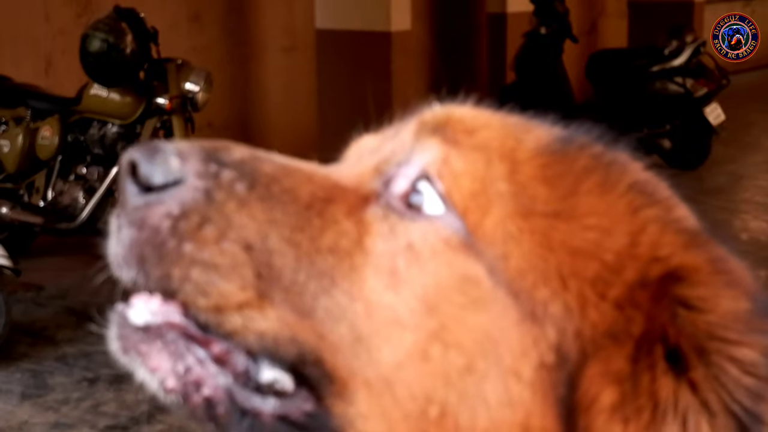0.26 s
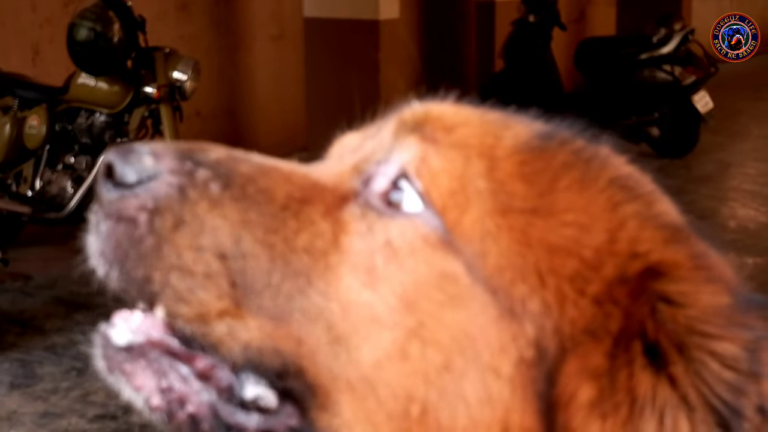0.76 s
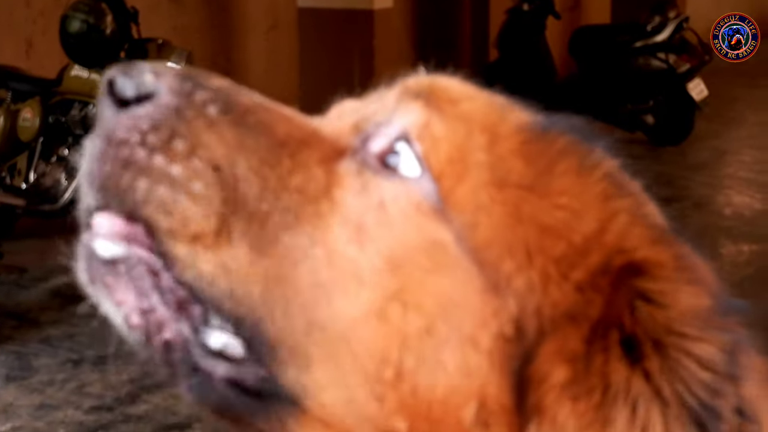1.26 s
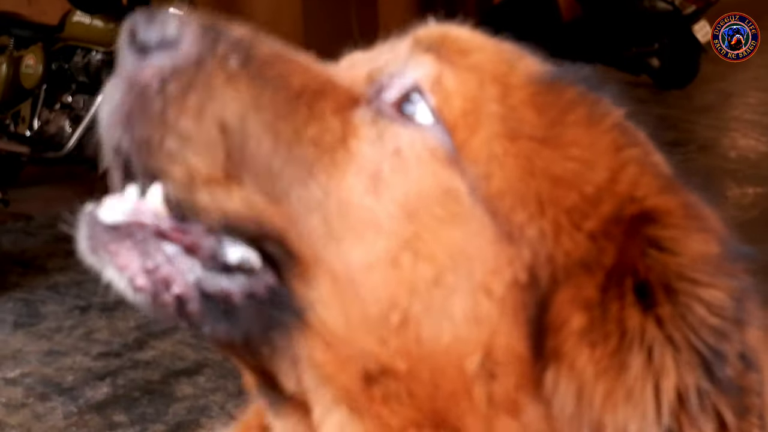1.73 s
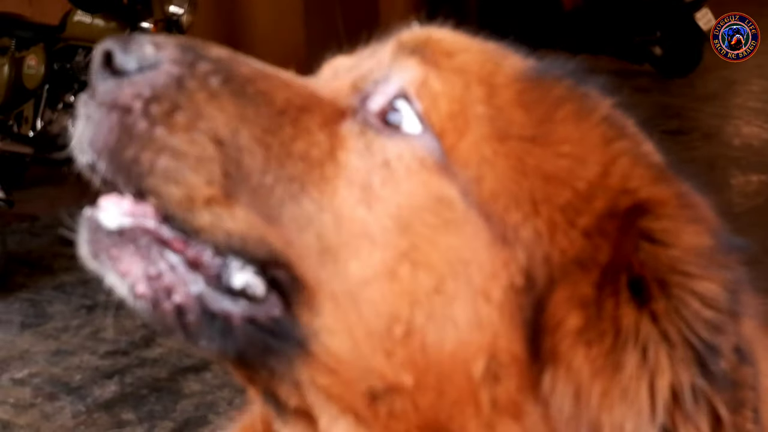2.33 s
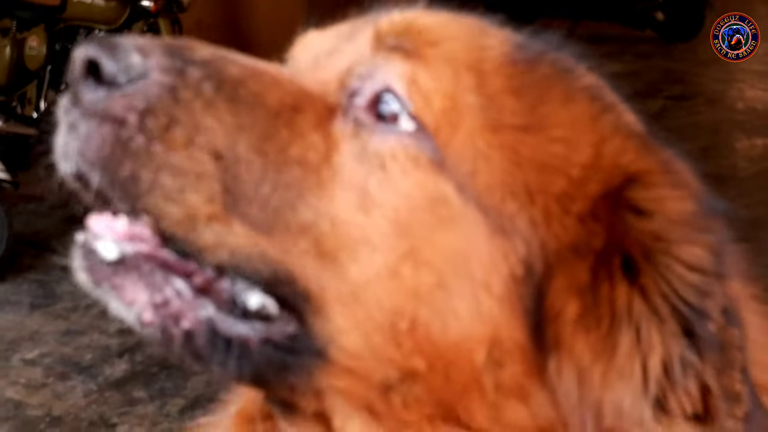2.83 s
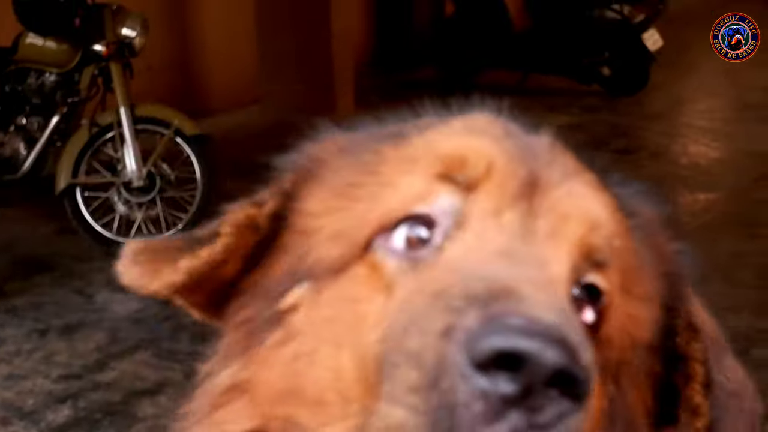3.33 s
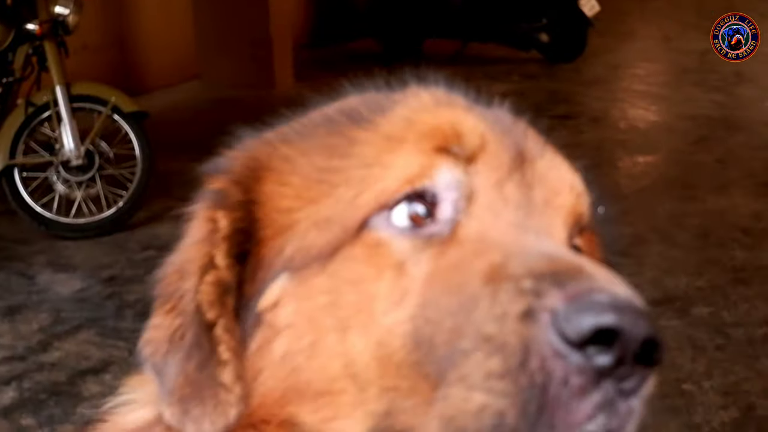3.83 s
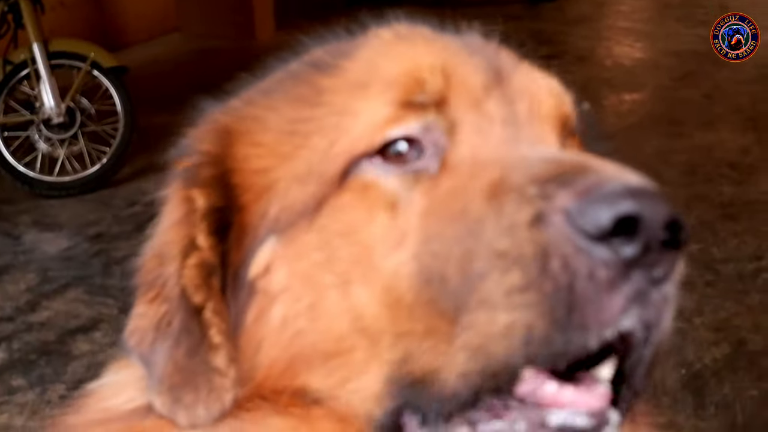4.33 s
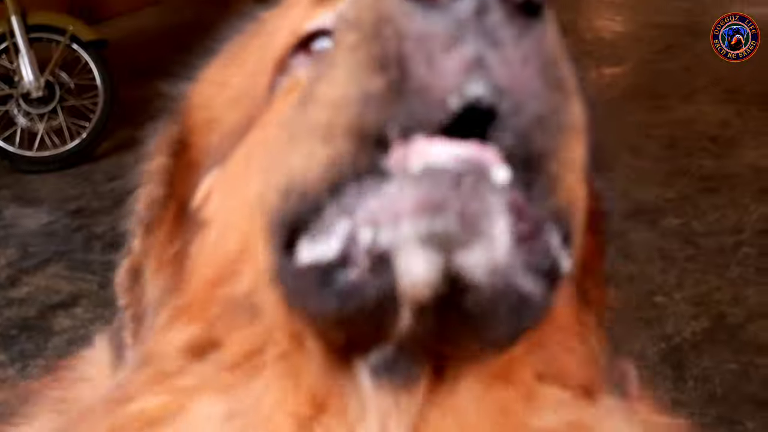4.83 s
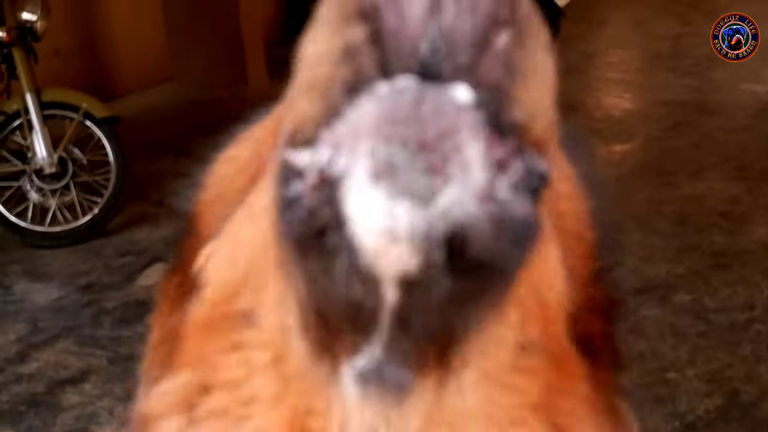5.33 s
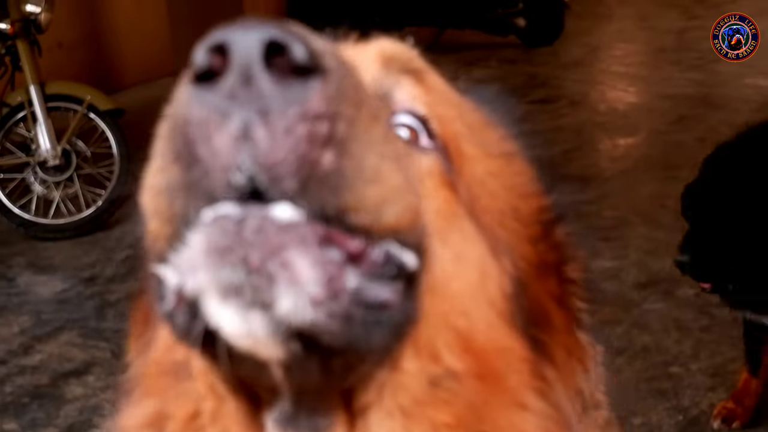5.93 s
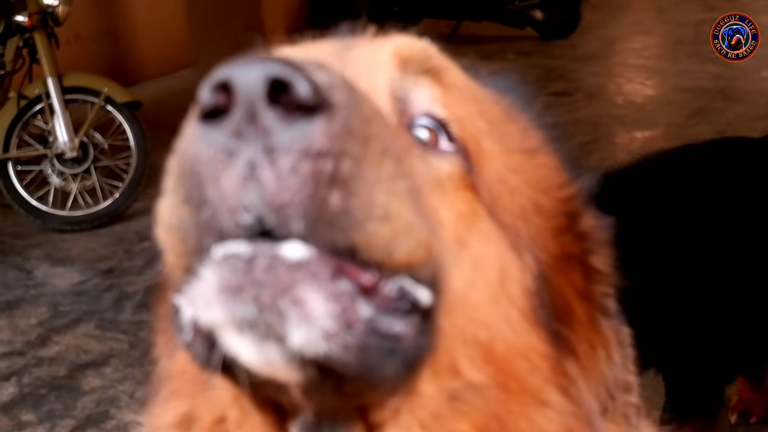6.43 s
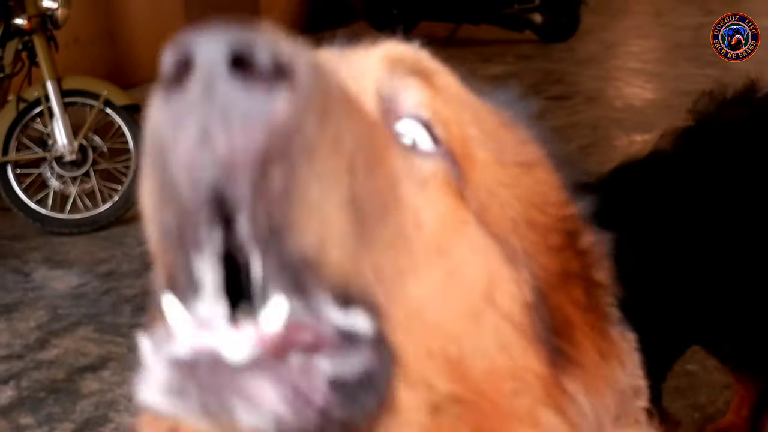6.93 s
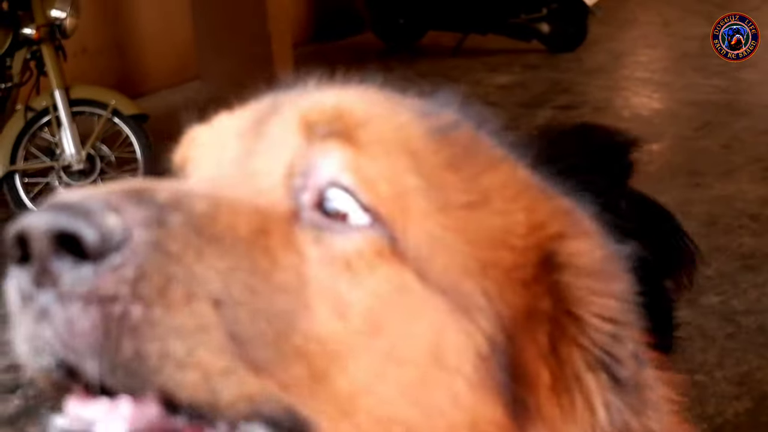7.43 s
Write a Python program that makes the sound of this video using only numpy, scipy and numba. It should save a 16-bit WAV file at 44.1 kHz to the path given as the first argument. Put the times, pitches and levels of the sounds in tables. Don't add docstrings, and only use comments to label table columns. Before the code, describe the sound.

A large dog barks loudly and hoarsely up close in an echoing hall, growling between barks, while another dog answers far off and a third pants and whines.

```python
import sys
import numpy as np
from scipy import signal
from scipy.fft import rfft, irfft, next_fast_len
from scipy.io import wavfile
from scipy.ndimage import uniform_filter1d, minimum_filter1d
from numba import njit

SR = 44100
rng = np.random.default_rng(int(sys.argv[2]) if len(sys.argv) > 2 else 0)


def volts_from_decibels(level):
    exponent = np.asarray(level, float) / 20
    return 10 ** exponent


def dump(signal):
    limited = np.clip(np.atleast_2d(signal).T, -1, 1)
    pcm = np.round(limited * 32767).astype(np.int16)
    wavfile.write(sys.argv[1], SR, pcm)


N = 338247
TIME = np.arange(N) / SR

# start_s, hold_s (until the release), early_pitch_hz, top_pitch_hz, level_db
NEAR_BARKS = [
    (1.162, .1, 290, 355, -14),
    (1.878, 0.087, 310.3, 365, -12),
    (2.532, .075, 320.9, 360, -11),
    (3.164, .085, 369.9, 400, -12),
    (4.772, 0.11, 320, 385.3, -11.5),
    (5.396, .1, 300.4, 377.2, -12),
    (5.718, .1, 369.7, 385, -13.5),
    (7.046, 0.12, 270, 365, -12),
    (7.641, 0.061, 382.3, 400, -9.5),
]
# pitch_hz, side_minus_mid_db
SIDE_WIDTH = [(60, -14), (200, -23.5), (500, -23.5), (1000, -17), (2000, -13.5), (3200, -7), (5000, -4),
              (9000, 1), (13000, -5.5)]


def unit_rms(x):
    return x / np.sqrt(np.mean(x ** 2) + 1e-20)


def at_hz(points, hz):
    table_hz, values = np.array(points)[:, 0], np.array(points)[:, 1]
    return np.interp(np.log(hz + 1), np.log(table_hz), values)


def colour(x, spectrum):
    size = next_fast_len(N)
    gain = volts_from_decibels(at_hz(spectrum, np.fft.rfftfreq(size, 1 / SR)))
    return irfft(rfft(x, size) * gain, size)[..., :N]


def filtered(x, order, hz, kind="low"):
    return signal.sosfilt(signal.butter(order, hz, kind, fs=SR, output="sos"), x)


def calls(tables, fade_s):
    times, *columns = np.concatenate(tables).T
    gate = sum((TIME >= c[0][0]) & (TIME <= c[-1][0]) for c in tables).clip(0, 1)
    gate = uniform_filter1d(gate * 1.0, max(int(fade_s * SR), 1))
    times = np.maximum.accumulate(times)
    return [gate] + [np.interp(TIME, times, c) for c in columns]


def drift(rate_hz):
    r = np.exp(-2 * np.pi * rate_hz / SR)
    wander = signal.lfilter([1], [1, -2 * r, r * r], rng.standard_normal(N + SR))
    return unit_rms(wander[SR:])


def evened(x, span_s):
    power = uniform_filter1d(x ** 2, int(span_s * SR)).clip(0)
    return x / np.sqrt(power + 1e-3 * np.mean(x ** 2))


@njit
def ring(x, hz, width_hz, rate):
    out, r = np.zeros(len(x)), np.exp(-np.pi * width_hz / rate)
    for i in range(2, len(x)):
        push = (1 - r * r) / 2 * (x[i] - x[i - 2])
        out[i] = push + 2 * r * np.cos(2 * np.pi * hz[i] / rate) * out[i - 1] - r * r * out[i - 2]
    return out


def throat(x, modes, stretch=1):
    total = 0
    for k, (hz, width_hz, db) in enumerate(modes):
        total = total + (-1) ** k * volts_from_decibels(db) * ring(x, np.full(N, float(hz)) * stretch, width_hz, SR)
    return total


def folds(pitch_hz, hoarse, jitter, uneven_db):
    phase = np.cumsum(pitch_hz * (1 + jitter * hoarse * drift(70))) / SR
    closing = np.diff(np.floor(phase), prepend=0) > 0
    strong_weak = 1 - 0.88 * hoarse * (np.floor(phase) % 2)
    clicks = closing * strong_weak * volts_from_decibels(uneven_db * hoarse * rng.standard_normal(N))
    leak = rng.standard_normal(N) * np.sin(np.pi * phase) ** 2
    return phase, unit_rms(clicks) + 2.13 * hoarse * leak


def since_bark():
    starts = np.array([-9.0] + [bark[0] for bark in NEAR_BARKS])
    return TIME - starts[np.searchsorted(starts, TIME, "right") - 1]


def left_right(mid_side):
    mid, side = mid_side
    return np.array([mid + side, mid - side])


def leaning(x, lean):
    left = colour(x[0], np.array(lean) * [1, .5])
    right = colour(x[-1], np.array(lean) * [1, -.5])
    return np.array([left, right])


def murmur():
    # pitch_hz, level_db (per Hz)
    hall_air = [(25, -33.5), (70, -8.5), (130, -13.5), (180, -2), (300, -5.5), (450, -9.5), (1200, -13),
                (3000, -18.5), (3800, -32), (5000, -28.5), (7000, -37.5), (12000, -67)]
    low_db, high_db = -40, -64
    duck_db, recover_db_per_s, high_follows = -17, 13.5, 1.4
    pressed_db = np.minimum(duck_db + recover_db_per_s * since_bark(), 0)
    pressed_db = uniform_filter1d(pressed_db, int(0.035 * SR))
    low_db, high_db = low_db + pressed_db, high_db + high_follows * pressed_db
    mid, side = colour(rng.standard_normal((2, N)), hall_air)
    air = np.array([mid, colour(side, SIDE_WIDTH)])
    low, high = filtered(air, 2, 1200, "low"), filtered(air, 2, 1200, "high")
    return volts_from_decibels(low_db + 0.5) * low / np.std(low[0]) - volts_from_decibels(high_db + 9) * high / np.std(high[0])


def hall(x):
    # pitch_hz, time_s
    echo_time = [(60, 2.18), (300, 1.27), (700, 1.675), (1500, 0.89), (3000, 1.34), (6000, 0.71),
                 (12000, 0.65)]
    # pitch_hz, level_db
    standing_waves = [(340, -20), (366, -25.5), (418, -27), (655, -27.5), (676, -33), (1055, -26.5),
                      (1228, -40)]
    t = np.arange(2 * SR) / SR
    waves = sum(volts_from_decibels(db) * np.sin(2 * np.pi * hz * t) for hz, db in standing_waves)
    air = rng.standard_normal((2, len(t))) + waves * [[1], [0]]
    tail = 0
    for hz in 63.03 * 2 ** np.arange(8):
        octave = filtered(air, 2, [hz / np.sqrt(2), hz * np.sqrt(2)], "band")
        tail = tail + octave * volts_from_decibels(-60 * t / at_hz(echo_time, hz))
    tail = tail * (1 - np.exp(-t / 0.0011))
    tail = tail / np.sqrt(np.sum(tail[0] ** 2))
    mid, side = signal.fftconvolve(x[None], tail, axes=1)[:, :N]
    return np.array([mid, colour(side, SIDE_WIDTH)])


def note_phrases(slides, scoops=()):
    edge_db, squareness, link_s = -17.5, 1.85, .11
    u = np.linspace(0, 1, num=15)
    rows = [(row, u) for row in slides] + [(row, 1 - (2 * u - 1) ** 2) for row in scoops]
    points = []
    for (s, length, a, b, db), path in sorted(rows, key=lambda r: r[0][0]):
        swell_db = db + edge_db * np.abs(2 * u - 1) ** squareness
        points.append(np.transpose([s + length * u, a + (b - a) * path, swell_db]))
    points = np.concatenate(points)
    return np.split(points, np.flatnonzero(np.diff(points[:, 0]) > link_s) + 1)


def whistle(phrases, flutter_db, waver):
    gate, hz, level_db = calls(phrases, fade_s=.015)
    hz = uniform_filter1d(hz, int(0.021 * SR))
    angle = 2 * np.pi * np.cumsum(hz * (1 + waver * drift(49))) / SR
    tone = np.sin(angle) + volts_from_decibels(-48) * np.sin(2 * angle)
    return gate * np.sqrt(2) * volts_from_decibels(level_db + flutter_db * drift(56)) * tone


def squeaks():
    # start_s, length_s, first_hz, last_hz, level_db
    squeak_notes = [
        (.7, 0.19, 4500, 4140, -66.5),
        (3.26, 0.059, 9100, 9200, -69),
        (3.37, 0.044, 8824, 9060, -68),
        (3.43, 0.081, 9340, 9440, -67.5),
        (3.58, 0.12, 4057, 4100, -74),
    ]
    return whistle(note_phrases(squeak_notes), 2.5, 0.0058)


def far_points(s, hold_s, top_hz, db, stretch):
    attack_s, release_s = .035, .065
    times = s + np.cumsum([0, attack_s, hold_s, release_s, release_s])
    pitch_hz = top_hz * np.array([.73, .8, 1.0, 1.0, .8])
    level_db = db + np.array([-16.5, 0, 0, -12, -24])
    return np.transpose([times, pitch_hz, level_db, stretch + 0 * times])


def far_dog():
    # start_s, hold_s, top_pitch_hz, level_db (at the dog), stretch (of the throat pitches, a ratio)
    far_barks = [
        (.11, .075, 420, -11, 0.95),
        (0.784, .07, 424, -11, 1.019),
        (1.19, .07, 420, -18, 1.02),
        (3.764, .12, 396.1, -16, 1.06),
    ]
    # pitch_hz, width_hz, level_db
    far_throat = [(310, 69.4, -7), (412.5, 48.5, 1), (567, 56.7, -7.5), (650, 24.1, 4), (735, 89.6, -3.5),
                  (1079.5, 49, -7.5), (1270, 216, -19.5), (1850, 323, -25.5), (2430, 120, -62),
                  (3100, 310, -50.5), (4470, 540, -49)]
    gate, pitch_hz, level_db, stretch = calls([far_points(*row) for row in far_barks], fade_s=.015)
    phase, source = folds(pitch_hz, hoarse=.6, jitter=.12, uneven_db=10.0)
    dull = filtered(throat(source, far_throat, stretch), 2, 6000)
    base = volts_from_decibels(-5.5) * np.sin(2 * np.pi * phase)
    return gate * volts_from_decibels(level_db) * (evened(dull, 0.043) + base)


def pant():
    # start_s, length_s, early_db (relative to the top), top_db
    breaths = [(0.294, 0.16, -11.5, -45), (0.618, 0.24, -6, -58.5), (1.063, .125, -24, -43.5),
               (1.337, .38, -10, -57), (2.384, 0.17, -14.5, -49), (2.707, 0.2, -8.5, -59.5),
               (3.032, 0.17, -15.5, -51), (4.081, .15, -2, -48.5), (4.343, .46, -8, -42.5),
               (5.9, 0.31, 2.5, -71.5), (6.616, 0.7, -2, -70.5), (7.425, 0.16, -9, -62)]
    # pitch_hz, level_db (per Hz)
    breath_air = [(1500, 1), (2200, -3), (3800, -8.5), (4700, -9.5), (6000, -15), (7500, -19.5),
                  (9000, -20), (10800, -15.5), (12500, -22), (14000, -25.5), (15000, -71)]
    rise_s, fall_s, start_db, end_db = 0.017, 0.09, -11, -20.5
    tables = []
    for s, length, early, db in breaths:
        tables.append([(s - rise_s, db + early + start_db), (s, db + early),
                       (s + length, db), (s + length + fall_s, db + end_db)])
    gate, level_db = calls(tables, fade_s=0.046)
    air = colour(rng.standard_normal((2, N)), [(500, -31)] + breath_air)
    dull = filtered(air, 8, 11800)
    mid, side = dull + np.clip((level_db + 59.5) / 12, 0, 1) * (air - dull)
    unsteady_db = 1.0 * drift(25) + .7 * drift(6)
    air = np.array([mid, volts_from_decibels(-0.5) * colour(side, SIDE_WIDTH)]) / np.std(mid)
    return gate * volts_from_decibels(level_db + 4.5 + unsteady_db) * air


def whine():
    # start_s, length_s, first_hz, last_hz, level_db
    slides = [(.31, 0.15, 2982, 3297, -28), (1.11, .075, 3154, 3278, -30.5), (1.67, .085, 3233, 2752, -30),
              (2.41, .07, 3016, 3236, -35.5), (2.665, 0.074, 2943, 2830, -39.5),
              (3.13, 0.067, 3070, 3220, -41), (4.065, 0.069, 2995, 3270, -33), (4.15, .07, 3355, 3450, -51),
              (4.35, .05, 3090, 2970, -27.5), (4.4, 0.055, 2990, 3127, -39.5),
              (4.47, .075, 3190, 3250, -31.5), (4.55, .115, 3180, 2950, -24.5),
              (4.68, 0.072, 3000, 3000, -37), (4.75, 0.072, 2975, 3090, -35.5),
              (4.91, .09, 3030, 2810, -46.5), (5.62, .14, 2935, 3267, -43), (5.79, 0.21, 3374, 3200, -58.5),
              (5.98, .08, 2990, 2980, -47), (6.06, .15, 2893, 2895, -35), (6.21, 0.27, 2887, 3030, -69),
              (7.43, 0.08, 2844, 3197, -36.5), (7.5, 0.057, 3160, 3245, -36.5)]
    # start_s, length_s, edge_hz, middle_hz, level_db
    scoops = [
        (1.31, 0.25, 3180, 3003, -41.5),
        (2.761, .17, 2950, 3223, -60.5),
        (2.927, 0.23, 3090, 2784, -35.5),
    ]
    # start_s, length_s, first_hz, last_hz, level_db
    upper_notes = [
        (.36, .11, 3800, 3740, -54.5),
        (1.14, 0.1, 3890, 3880, -45),
        (1.22, 0.076, 3860, 3827, -60),
        (2.46, 0.054, 3880, 3830, -52.5),
        (2.5, 0.048, 3880, 4010, -43),
        (4.12, 0.15, 3785, 3854, -44),
        (5.83, .12, 3930, 3690, -67.5),
    ]
    # start_s, length_s, first_hz, last_hz, level_db
    lower_notes = [
        (1.24, .05, 2800, 2750, -49),
        (1.71, .06, 2360, 2310, -50),
        (2.98, .13, 2400, 2440, -49.5),
        (6.11, .1, 2430, 2430, -54.5),
        (5.57, .07, 2426, 2550, -58),
        (7.4, 0.04, 2397, 2620, -51.5),
    ]
    main = whistle(note_phrases(slides, scoops), 3.02, 0.0067)
    upper = whistle(note_phrases(upper_notes), 4.6, 0.0019)
    lower = whistle(note_phrases(lower_notes), 4.0, .03)
    return main + upper + lower


def growl():
    # start_s, length_s, pulses_per_s, first_db, last_db
    growls = [
        (0.0, .43, 70.6, -35, -45.5),
        (0.444, 0.41, 76, -42, -30.5),
        (4.305, .46, 70, -59.5, -34),
        (5.896, .45, 76.3, -41.5, -44),
        (6.359, .385, 74, -41, -34.5),
        (6.814, 0.32, 80, -61, -45),
    ]
    # pitch_hz, width_hz, level_db
    chest = [(70.6, 26, -21.5), (167.8, 54, -3), (254.6, 26, 5.5), (353, 32.3, 0), (640, 43, -10.5),
             (1400, 410, -24.5), (2090, 200, -24.5)]
    stop_s, stop_db = 0.0037, 2.5
    tables = [[(s, rate, first), (s + length, rate, last), (s + length + stop_s, rate, last + stop_db)]
              for s, length, rate, first, last in growls]
    gate, pulses_per_s, level_db = calls(tables, fade_s=0.02)
    phase, source = folds(pulses_per_s, hoarse=.2, jitter=.4, uneven_db=12)
    soft = filtered(source, 2, 900)
    throb = volts_from_decibels(1.5 * np.sin(2 * np.pi * 5.8 * TIME + 2.0 * drift(3.8)))
    return gate * volts_from_decibels(level_db + 3.0) * evened(throat(soft, chest) * throb, 0.1)


def puffs():
    # start_s, level_db
    air_puffs = [
        (.8, -53),
        (1.19, -52),
        (1.889, -57),
        (3.19, -45),
        (4.78, -34),
        (5.41, -53),
        (7.05, -30),
    ]
    hold_s, fade_s, sag_db, end_db = .055, 0.033, -6, -23.5
    tables = [[(s, db), (s + hold_s, db + sag_db), (s + hold_s + fade_s, db + end_db)] for s, db in air_puffs]
    gate, level_db = calls(tables, fade_s=0.024)
    low = filtered(rng.standard_normal(N), 3, [18, 125], "band")
    return gate * volts_from_decibels(level_db) * evened(low, 0.18)


def snap():
    start_s, level_db, decay_s = 7.8, -31, 0.006
    after = TIME - start_s
    burst = rng.standard_normal(N) * (after > 0) * np.exp(-after.clip(0) / decay_s)
    mouth_hz = np.full(N, 2800.0)
    return volts_from_decibels(level_db) * 8.5 * ring(ring(burst, mouth_hz, 1500.0, SR), mouth_hz, 700.0, SR)


def bark_points(s, hold_s, early_hz, top_hz, db):
    attack_s, release_s = .033, .07
    times = s + np.cumsum([0, attack_s, hold_s - attack_s, release_s])
    pitch_hz = [.92 * early_hz, early_hz, top_hz, .68 * top_hz]
    base_db = (-13, -1, -3.5, -29.5)
    mouth_db = (-28.5, -0.5, -7.5, -39.5)
    upper_db = (-42.5, -7.5, -13, -43)
    return np.transpose([times, pitch_hz, *(db + np.array([base_db, mouth_db, upper_db]))])


def near_dog():
    # pitch_hz, width_hz, level_db
    upper_hollows = [(998, 82, -13.5), (1232, 54.6, 6), (1407, 62.5, 1.5), (1575, 272, -8),
                     (2015, 50.5, -8)]
    # pitch_hz, level_db (per Hz)
    rasp_air = [(2200, -4), (2800, 1.5), (3300, -8), (4000, -28.5), (5100, -4.5), (6200, -18), (8000, -23),
                (11000, -24), (12500, -41.5), (15000, -65.5)]
    after = since_bark()
    barking = after < 1 / 4
    gate, pitch_hz, base_db, mouth_db, upper_db = calls([bark_points(*row) for row in NEAR_BARKS], fade_s=0.011)
    mouth_db = np.maximum(mouth_db, np.interp(TIME - .018, TIME, mouth_db))
    onset = np.where(barking, np.exp(-(after / 0.041) ** 2), 1)
    phase, source = folds(pitch_hz, hoarse=.4 + .4 * onset, jitter=.1, uneven_db=16.5)

    ragged = volts_from_decibels((3.0 + 6.1 * onset) * drift(71))
    tone = np.cos(2 * np.pi * phase - .9) + 0.24 * np.cos(3 * np.pi * phase)
    base = -np.sqrt(2) * tone * ragged * volts_from_decibels(base_db)

    mouth_hz = 690 + 170 * onset
    mouth = ring(ring(source, mouth_hz, 200.0, SR), mouth_hz, 150.0, SR)
    mouth = mouth + (1 - onset) * throat(source, [(681.7, 7.9, 4.3)])

    rasp = unit_rms(colour(rng.standard_normal(N), rasp_air)) * (0.24 + np.sin(np.pi * phase) ** 2)
    bright = colour(rng.standard_normal(N), [(3000, -21), (4500, -1.5), (6500, 2), (9000, -21)])
    late = ring(bright, 5000 + 4000 * np.minimum(after, .2), 500.0, SR)
    late = np.clip(after / 0.12, 0, 1) ** 2 * barking * late
    rasp = (1 - 0.69 * onset) * rasp + volts_from_decibels(11.5) * late

    upper = evened(throat(source, upper_hollows), .012) + volts_from_decibels(-25.0) * rasp
    body = volts_from_decibels(mouth_db) * evened(mouth, 0.012) + volts_from_decibels(upper_db) * upper
    return gate * filtered(base - body, 3, 150, "high")


def scene():
    # pitch_hz, left_minus_right_db
    near_lean = [(300, 0.5), (700, 0.44), (1400, 1.55), (3000, 3.5), (9000, -2)]
    pant_lean = [(1500, -0.5), (3000, 3), (4500, 2.5), (8000, -3), (11000, -3.5), (13500, 0)]
    near, far, low, thin = near_dog(), far_dog(), growl(), whine()
    ducked = volts_from_decibels(-11 * np.exp(-since_bark() / 0.11))
    ducked = uniform_filter1d(ducked, int(0.03 * SR), origin=int(.015 * SR))
    older = hall(volts_from_decibels(-2.5) * far + volts_from_decibels(-13.5) * low + volts_from_decibels(-14) * thin + squeaks())
    echo = ducked * older + volts_from_decibels(-19) * hall(near)
    background = left_right(echo + murmur()) + volts_from_decibels(-4.5) * far
    panting = leaning(left_right(pant()) + thin, pant_lean)
    barking = leaning([near + snap()], near_lean) + low + puffs()
    return background + panting + barking


def roll_off(x):
    return signal.sosfilt(signal.butter(12, 14800, fs=SR, output="sos"), x)


def record(dry):
    ceiling, span = .9, int(0.005 * SR)
    peak = np.abs(dry).max(axis=0) + 1e-9
    room_left = minimum_filter1d(np.minimum(1, ceiling / peak), 2 * span)
    mix = dry * uniform_filter1d(room_left, span)
    return roll_off(mix)


dry = scene()
out = record(dry)
dump(out)
```